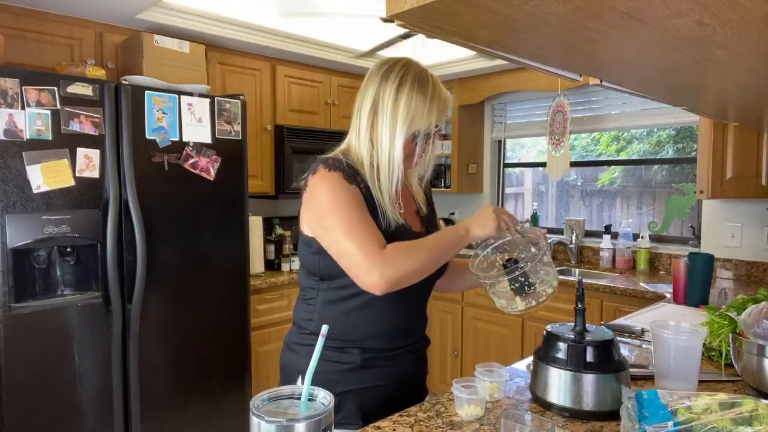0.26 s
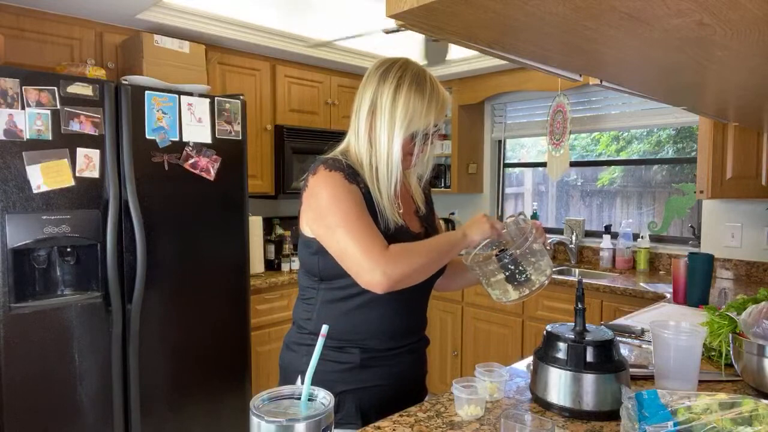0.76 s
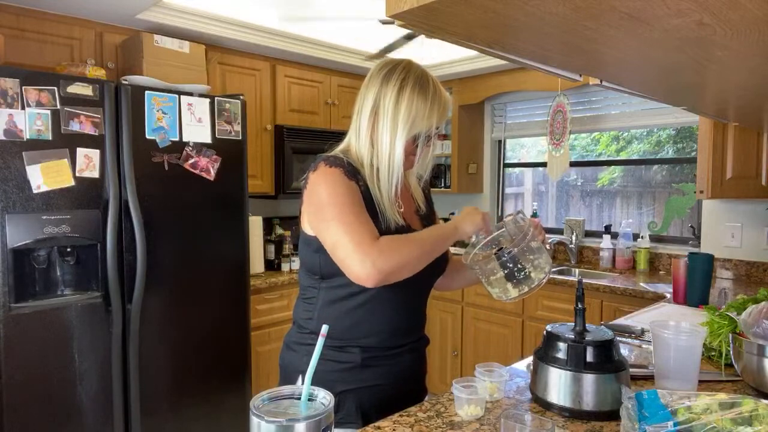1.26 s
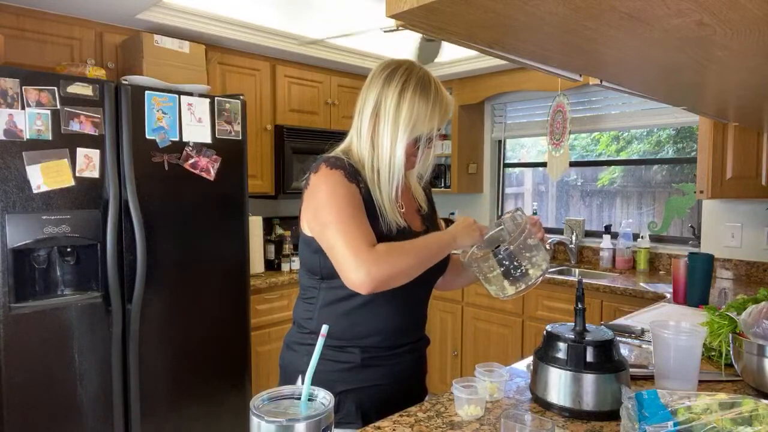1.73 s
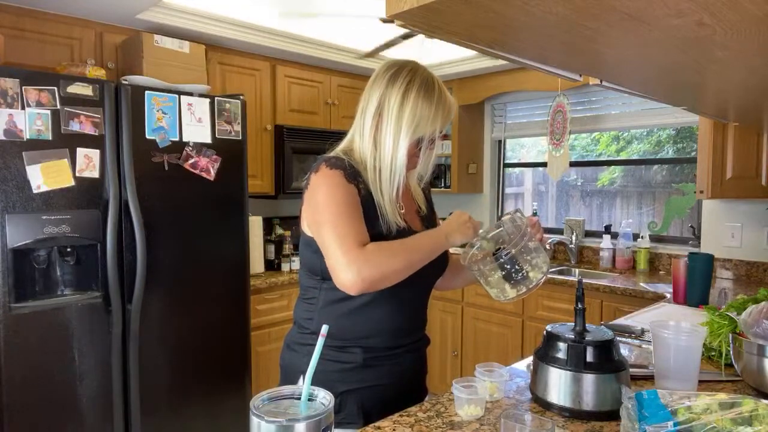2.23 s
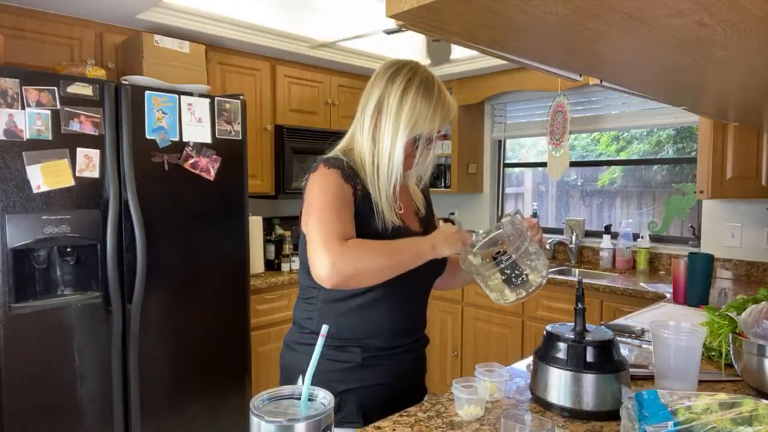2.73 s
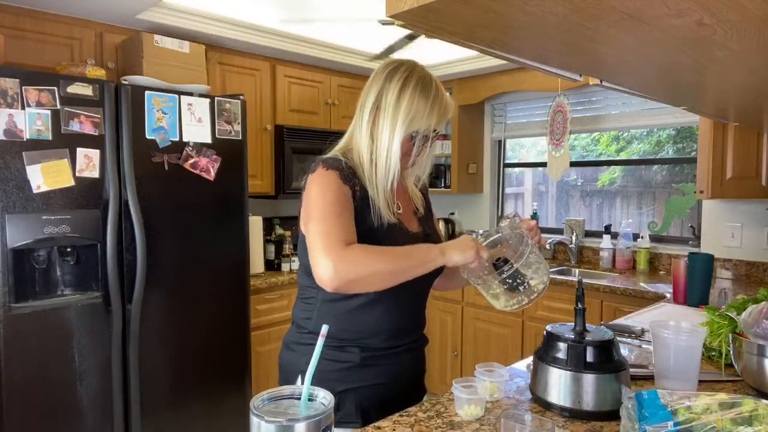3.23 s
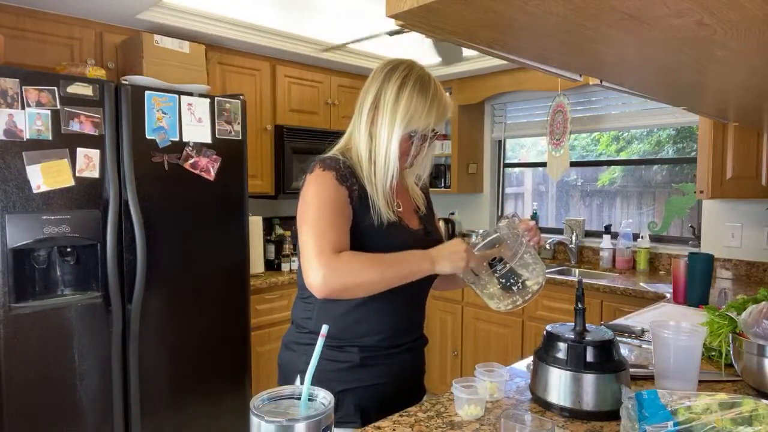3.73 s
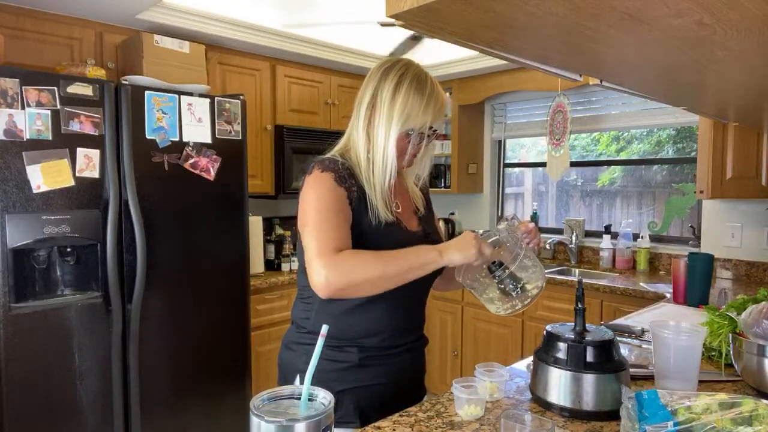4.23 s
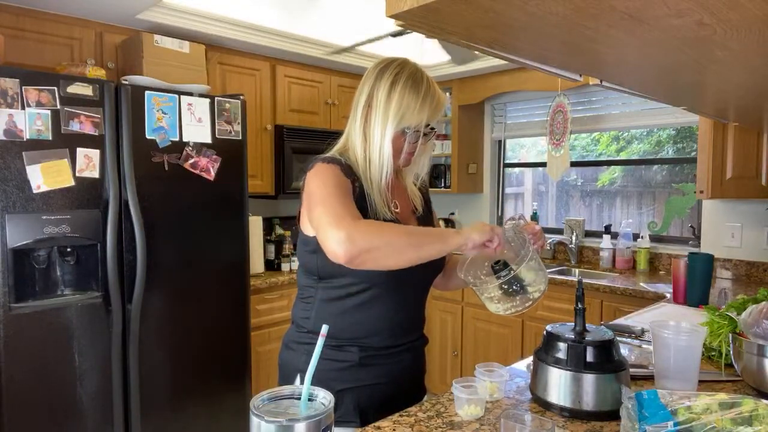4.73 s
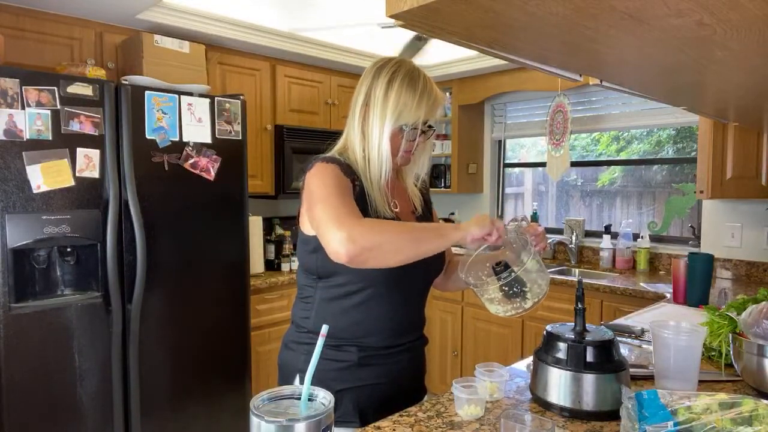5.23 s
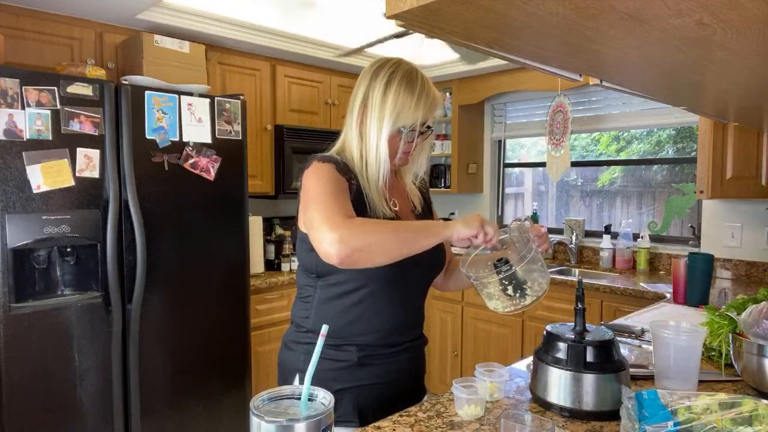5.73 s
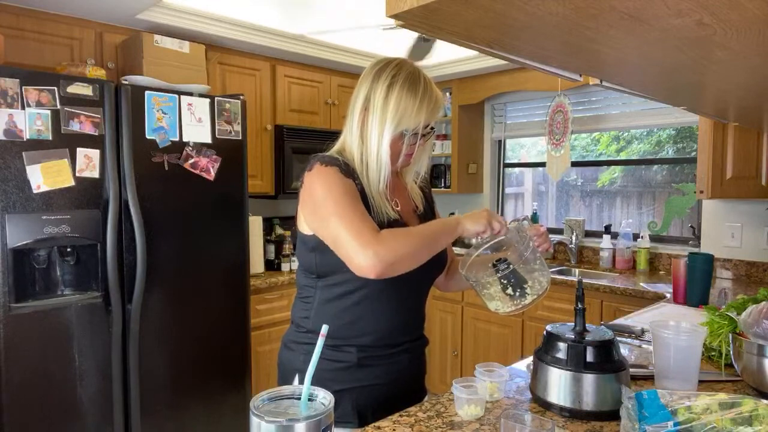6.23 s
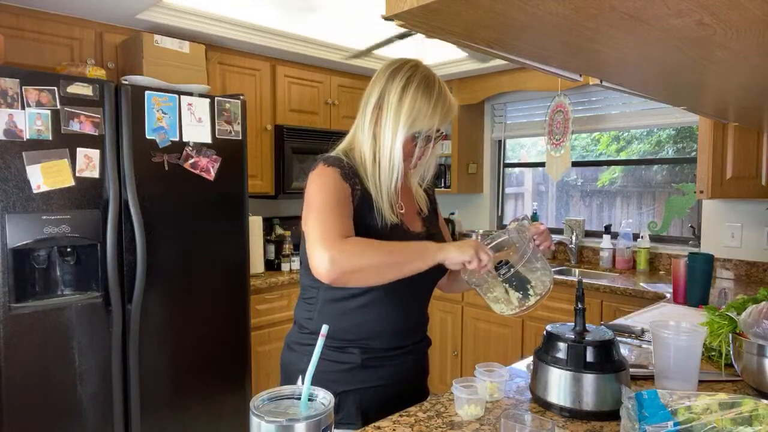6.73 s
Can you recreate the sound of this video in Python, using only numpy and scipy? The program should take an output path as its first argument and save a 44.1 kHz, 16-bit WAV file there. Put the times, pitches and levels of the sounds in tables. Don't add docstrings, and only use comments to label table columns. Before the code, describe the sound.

In a home kitchen, a steel spoon works inside a hard plastic food processor bowl. Sharp edge knocks, hollow thumps and light ticks come irregularly, two or three a second, with short faint scrapes between them. Two loud slaps fall near two seconds, close double knocks follow at three and four and a half, and loose rattles trail some blows. A small microphone nearby catches short room echoes and low fridge and fan hum.

```python
import sys
import numpy as np
from scipy import signal
from scipy.fft import rfft, irfft
from scipy.io import wavfile

SR = 44100
rng = np.random.default_rng(int(sys.argv[2]) if len(sys.argv) > 2 else 0)


def unload_audio(sound):
    columns = np.transpose(np.atleast_2d(sound))
    steps = np.round(np.clip(columns, -1, 1) * 32767)
    wavfile.write(sys.argv[1], SR, steps.astype(np.int16))


def attenuation_scalar(level_db):
    decades = np.asarray(level_db, float) / 20
    return 10 ** decades


N = 307127

# (frequency [Hz], level [dB])
HUM_SPECTRUM = [(24, -78), (40, -6.5), (60, -10), (100, -1.5), (127, -5.5), (167, -6.5), (226, -4),
                (297, -8.5), (402, -4.5), (680, -14), (1200, -15), (2500, -25.5), (6000, -34.5),
                (16000, -42.5)]
# (frequency [Hz], rms level [dB])
MAINS_LINES = [(119, -63), (238, -70.5)]
# (start [s], rise [s], fall [s], rasp level at the top [dB])
SLIDE_STROKES = [(0, 0.0014, 0.092, -49), (0.331, .1, 0.13, -47.5), (.78, 0.038, 0.16, -41.5),
                 (1.17, 0.027, 0.053, -41), (1.4, .004, 0.063, -62), (1.48, 0.058, 0.18, -52),
                 (1.7, 0.039, .06, -75), (1.79, 0.043, .03, -50), (2.065, 0.006, .06, -41.5),
                 (2.28, 0.085, 0.11, -50.5), (2.6, .006, 0.068, -47.5), (3.035, .02, 0.077, -37),
                 (3.46, .04, 0.078, -44), (4.81, 0.016, 0.045, -47.5), (5.04, .05, 0.085, -51.5),
                 (5.14, .004, 0.06, -53), (5.34, 0.087, 0.059, -51.5), (5.93, .006, 0.16, -54),
                 (6.84, 0.039, 0.069, -48.5)]
# (frequency [Hz], level [dB])
RASP_SPECTRUM = [(710, -2.5), (1200, 1.5), (3080, -1), (3740, 2), (4040, 1.5), (5130, -6.5), (13600, -9.5),
                 (16000, -10)]
# (frequency [Hz], t60 [s])
ROOM_DECAY = [(250, 0.24), (560, 0.38), (1250, 0.52), (2200, 0.49), (4000, 0.59), (8000, 0.44),
              (12100, 0.36)]
# (time [s], tick peak [dB], clack pitch [Hz], clack level [dB], sizzle level
# [dB])
GRAZES = [
    (0.067, -49, 6940, -51.5, -46),
    (.445, -53, 3530, -49, -54),
    (0.855, -70, 3760, -35, -58),
    (1.104, -52, 3340, -51.5, -59),
    (1.705, -58, 3300, -60, -56),
    (1.978, -45, 3200, -49, -52),
    (2.068, -38, 3160, -35.5, -40),
    (3.049, -32, 2500, -27.5, -58),
    (5.466, -37, 3230, -71, -52),
]
TAPS = [
    (0.072, -28, 4040, -65, -41.5),
    (0.4883, -35, 3060, -52, -40.5),
    (0.924, -32, 3250, -38.5, -41),
    (1.5, -35, 2980, -47, -36.5),
    (1.7439, -44, 3260, -48, -47),
    (1.788, -45, 3120, -50, -49.5),
    (2.3436, -35, 3500, -42, -40),
    (2.3692, -38, 3170, -41.5, -46),
    (3.55, -34, 3600, -39, -52),
    (5.94, -41, 3100, -47.5, -45),
]
# (time [s], sizzle level [dB], struck spot pitch [Hz], struck spot level [dB], clack pitch [Hz])
EDGE_KNOCKS = [(0.314, -22.5, 1800, -25, 3300), (1.1408, -29.5, 1664, -20.5, 3390),
               (1.3682, -26, 1710, -32, 4000), (2.7868, -23.5, 1660, -21, 4000),
               (3.021, -27.5, 1510, -26, 3700), (3.4214, -16.5, 1915, -20, 3520),
               (3.7216, -20, 1657, -23, 3140), (4.0455, -21, 1683, -23, 2774),
               (4.3776, -32, 1600, -29.5, 3660), (4.7954, -40, 1690, -39, 3980),
               (5.0183, -37, 1852, -37.5, 3700), (5.1231, -25.5, 1366, -28.5, 3220),
               (6.3415, -30.5, 1694, -18.5, 3300), (6.7885, -38, 1590, -39.5, 2810)]
LIP_KNOCKS = [
    (2.2566, -36.5, 2050, -38, 3180),
    (5.3052, -27, 1760, -27.5, 4040),
    (5.6079, -21.5, 1656, -23.5, 3450),
    (6.229, -27.5, 1730, -32, 3630),
]
# (time [s], hollow level [dB], rim level [dB], struck spot level [dB], clack level [dB])
BACK_KNOCKS = [(.748, -23, -34, -24, -27), (1.571, -37, -37.5, -34, -33), (1.847, -23, -17, -20, -24),
               (2.0963, -24, -15.5, -19, -23.5), (2.5721, -37.5, -33, -39, -35),
               (3.0941, -20, -16.5, -32, -23.5), (3.1319, -18.5, -18.5, -27, -28.5),
               (4.4006, -21, -19, -30, -22.5), (4.4386, -17.5, -20.5, -29, -27),
               (5.1788, -22.5, -24.5, -33, -38), (6.1264, -35.5, -33.5, -43, -36),
               (6.5756, -32, -36.5, -38, -34.5), (6.816, -22, -23, -29.5, -25)]
# (first bounce [s], hollow level [dB], rim level [dB], bounces [count])
RATTLES = [(.7747, -21, -33, 1), (1.1697, -25.5, -54, 1), (1.5848, -24.5, -35.5, 2), (2.1157, -29, -42, 1),
           (3.1199, -25.5, -19, 1), (3.1507, -21.5, -34, 3), (3.2977, -42.5, -46, 1),
           (3.554, -24, -31.5, 3), (4.2094, -40, -44.5, 1), (4.4611, -24, -36.5, 3), (5.1987, -26, -32, 3),
           (6.5944, -29, -52, 1), (6.8338, -22, -26, 4)]
# (frequency [Hz], level [dB], t60 [s])
SPOON_MODES = [(3340, -10, .03), (4040, -18, .03)]
# (frequency [Hz], level [dB], t60 [s])
HOLLOW_MODES = [(342.3, -8, 0.085), (446, 0, 0.025), (547.6, 0.5, 0.072), (612, -6, 0.043),
                (637.3, -9.5, 0.07), (739, -8, 0.059), (949, -6, 0.031)]
# (frequency [Hz], level [dB], t60 [s])
RIM_MODES = [(1250, 0, .065), (1310, -6, .02), (1180, -10, .012)]
# (frequency [Hz], level [dB], t60 [s])
WALL_MODES = [(2027, -1, 0.032), (2163, -13, 0.1), (2460, -19, 0.004), (2464, -17, 0.064)]
# (time [s], pitch [Hz], peak level [dB])
SLAPS = [
    (1.1416, 1690, -13),
    (1.8456, 1390, -3.5),
    (2.0962, 1400, -5),
    (6.3418, 1620, -10),
    (6.5758, 1420, -20),
]
# (time [s], pitch [Hz], level [dB], t60 [s])
RINGS = [
    (1.142, 1690, -23, .07),
    (2.788, 4045, -25, .03),
    (5.609, 3420, -21, .025),
    (5.609, 780, -24, .02),
    (6.342, 1680, -22, .06),
]

HUM_DB = -54.5
SLIDE_RISE_DB, SLIDE_FALL_DB, SLIDE_FALL_BEND = 10, 20, 2.1
EARLY_T60_S = .09
BOWL_LAG_S = .0007
EDGE_TICK_DB, EDGE_CLACK_DB = 8.5, 2.5
EDGE_RIM_DB, EDGE_WALL_DB, EDGE_HOLLOW_DB = -5.5, 10, -6
LIP_RIM_DB, LIP_WALL_DB, LIP_HOLLOW_DB = -4.5, 3.0, -13.0
BACK_SPOT_HZ, BACK_CLACK_HZ = 1475, 3250
BACK_TICK_DB, BACK_SIZZLE_DB = 5, -7.5
BACK_WALL_DB, WALL_DAMPING = 3, 1.37
BOUNCE_GAP_S, BOUNCE_STRETCH, BOUNCE_LOSS_DB = .0148, 1.35, 5
RATTLE_SPOT_HZ, RATTLE_SPOT_DB, RATTLE_WALL_DB = 1438, -7.5, -1
SLAP_S, SLAP_ROOM_DB = 0.0039, -10


def at_hz(points, hz):
    points = np.array(points)
    return np.interp(np.log(hz), np.log(points[:, 0]), points[:, 1])


def coloured(white, spectrum):
    hz = np.maximum(np.fft.rfftfreq(len(white), 1 / SR), 1)
    shaped = irfft(rfft(white) * attenuation_scalar(at_hz(spectrum, hz)), len(white))
    return shaped / np.sqrt(np.mean(shaped ** 2) + 1e-20)


def band(x, low_hz, high_hz):
    sos = signal.butter(2, [low_hz, min(high_hz, .45 * SR)], "band", fs=SR, output="sos")
    return signal.sosfilt(sos, x)


def add(out, s, sound):
    at = round(s * SR)
    out[at:at + len(sound)] += sound[:N - at]


def struck(modes, chance, rise_s, spread_db=0.0, detune=0.01):
    t = np.arange(4096) / SR
    hz, level_db, t60 = np.transpose(modes)[:, :, None]
    count = len(modes)
    strength = chance[:count, None]
    shift = chance[8:8 + count, None]
    gain = attenuation_scalar(level_db + spread_db * strength) * np.sign(shift)
    modes_ringing = gain * np.sin(2 * np.pi * hz * (1 + detune * shift) * t) * attenuation_scalar(-60 * t / t60)
    return modes_ringing.sum(axis=0) * (1 - np.exp(-t / rise_s)) / np.sqrt(count)


def appliances():
    t = np.arange(N) / SR
    lines = sum(np.sqrt(2) * attenuation_scalar(level_db) * np.sin(2 * np.pi * hz * t) for hz, level_db in MAINS_LINES)
    return attenuation_scalar(HUM_DB) * coloured(rng.standard_normal(N), HUM_SPECTRUM) + lines


def slides():
    slips = (rng.random(N) < 5000 / SR) * attenuation_scalar(3.56 * rng.exponential(1, N)) * rng.choice([-1, 1], N)
    steps = N // 400 + 2
    pressure = np.interp(np.arange(N) / 400, np.arange(steps), rng.standard_normal(steps))
    rasp = coloured(slips * attenuation_scalar(0.99 * pressure), RASP_SPECTRUM)
    level, t = np.zeros(N), np.arange(N) / SR
    for s, rise_s, fall_s, top_db in SLIDE_STROKES:
        a, b = round(s * SR), round((s + rise_s + fall_s) * SR)
        since_top = t[a:b] - s - rise_s
        fade = np.clip(np.minimum(since_top + rise_s, fall_s - since_top) / .015, 0, 1)
        dip = SLIDE_RISE_DB * np.clip(-since_top / rise_s, 0, 1)
        dip += SLIDE_FALL_DB * np.clip(since_top / fall_s, 0, 1) ** SLIDE_FALL_BEND
        level[a:b] += fade * attenuation_scalar(top_db - dip)
    return level * rasp


def kitchen(x, early_db=-3, late_db=-5, first_s=0.0017):
    t = np.arange(SR // 2) / SR
    edges = 100 * 2 ** np.arange(0, 8, .5)
    white = rng.standard_normal((3, len(t)))
    late = 0
    for k, (low_hz, high_hz) in enumerate(zip(edges, edges[1:])):
        t60 = at_hz(ROOM_DECAY, np.sqrt(low_hz * high_hz))
        late = late + band(white[k % 2], low_hz, high_hz) * attenuation_scalar(-60 * t / t60) / np.sqrt(t60)
    early = white[2] ** 3 * attenuation_scalar(-60 * t / EARLY_T60_S)
    answer = attenuation_scalar(early_db) * early / np.linalg.norm(early) + attenuation_scalar(late_db) * late / np.linalg.norm(late)
    return signal.fftconvolve(x, answer * np.clip(t / first_s, 0, 1) ** 2)[:N]


def chatter(white, t60, rise_s=0.00073):
    t = np.arange(len(white)) / SR
    return white * attenuation_scalar(-60 * t / t60) * (1 - np.exp(-t / rise_s))


def knocks():
    pairs = []
    places = [(EDGE_KNOCKS, EDGE_RIM_DB, EDGE_WALL_DB, EDGE_HOLLOW_DB),
              (LIP_KNOCKS, LIP_RIM_DB, LIP_WALL_DB, LIP_HOLLOW_DB)]
    for rows, rim, wall, hollow in places:
        for s, sizzle, spot_hz, spot, clack_hz in rows:
            clack = (sizzle + spot) / 2 + EDGE_CLACK_DB
            pairs.append(((s + BOWL_LAG_S, spot + wall, spot + hollow, spot + rim, spot_hz, spot),
                          (s, sizzle + EDGE_TICK_DB, clack_hz, clack, sizzle)))
    for s, hollow, rim, spot, clack in BACK_KNOCKS:
        wall = clack + BACK_WALL_DB - WALL_DAMPING * (spot - clack)
        pairs.append(((s + BOWL_LAG_S, wall, hollow, rim, BACK_SPOT_HZ, spot),
                      (s, clack + BACK_TICK_DB, BACK_CLACK_HZ, clack, clack + BACK_SIZZLE_DB)))
    pairs.sort()
    return [pair[0] for pair in pairs], [pair[1] for pair in pairs]


def spoon():
    touches = sorted(knocks()[1] + TAPS) + GRAZES
    near, around = np.zeros(N), np.zeros(N)
    click = np.eye(1, 1024, k=64)[0]
    chance = rng.standard_normal((len(touches), 2, 16))
    patter = rng.standard_normal((len(touches), 2, 1024))
    hz = np.maximum(np.fft.rfftfreq(1024, 1 / SR), 1)
    for (s, tick_db, clack_hz, clack_db, sizzle_db), luck, noise in zip(touches, chance, patter):
        clack = [(clack_hz, 0, .028), (clack_hz * 0.89, -4, .007), (clack_hz * 1.092, -4, .007)]
        tone = attenuation_scalar(clack_db + 2.5) * struck(clack, luck[0], 0.00017, detune=0.0025)
        tone += attenuation_scalar(clack_db + 8.5) * struck(SPOON_MODES, luck[1], 0.00029, detune=0.0034)
        add(near, s, tone)
        add(around, s, tone)
        spectrum = [(250, clack_db - 16), (800, clack_db + 15.5), (3300, clack_db + 19.5),
                    (6300, tick_db + 5.5), (10500, sizzle_db + 9), (16000, sizzle_db + 6.5)]
        ripples = np.concatenate([luck[1, 2:8], luck[1, 10:], luck[0, 3:8]])
        ripple_db = 1.8 * np.interp(hz, np.linspace(2500, 16000, len(ripples)), ripples)
        colour = attenuation_scalar(at_hz(spectrum, hz) + ripple_db)
        burst = chatter(noise[0], 0.014)
        add(near, s, irfft(rfft(burst) * colour))
        add(around, s, irfft(rfft(click) * colour) * np.linalg.norm(burst))
        ramp = np.arange(1024)
        brush = noise[1] * np.clip(ramp / 350, 0, 1) * (ramp < 350)
        dull = colour / (1 + (hz / 6000) ** 4)
        add(near, s - 350 / SR, attenuation_scalar(-28) * irfft(rfft(brush) * dull))
    return near, around


def bowl():
    hard, loose = knocks()[0], rebounds()
    blows = hard + loose
    softness = [1] * len(hard) + [3.5] * len(loose)
    out, chance = np.zeros(N), rng.standard_normal((len(blows), 4, 16))
    for (s, wall_db, hollow_db, rim_db, spot_hz, spot_db), luck, soft in zip(blows, chance, softness):
        spot = [(spot_hz, 0, .011), (spot_hz * 1.004, -13, .05), (spot_hz * 0.833, -4, .008),
                (spot_hz * 1.15, -5, .008), (800, -13, .008)]
        add(out, s, attenuation_scalar(hollow_db + 10.0) * struck(HOLLOW_MODES, luck[0], .001 * soft, 3.5))
        add(out, s, attenuation_scalar(rim_db + 10.5) * struck(RIM_MODES, luck[1], .0005 * soft, 1.2, .004))
        add(out, s, attenuation_scalar(spot_db + 22.5) * struck(spot, luck[2], .0012 * soft, 1.0, .004))
        add(out, s, attenuation_scalar(wall_db - 1.0) * struck(WALL_MODES, luck[3], .0006 * soft, 1.5))
    return out


def rebounds():
    rows = []
    for s, hollow, rim, bounces in RATTLES:
        for k in range(round(bounces)):
            loss = BOUNCE_LOSS_DB * k
            mean = (hollow + rim) / 2 - loss
            rows.append((s, mean + RATTLE_WALL_DB, hollow - loss, rim - loss,
                         RATTLE_SPOT_HZ, mean + RATTLE_SPOT_DB))
            s = s + BOUNCE_GAP_S * BOUNCE_STRETCH ** k
    return rows


def slaps():
    out, t = np.zeros(N), np.arange(round(SLAP_S * SR)) / SR
    swell = np.sin(np.pi * t / SLAP_S) ** 2
    for s, hz, peak_db in SLAPS:
        add(out, s, attenuation_scalar(peak_db) * swell * np.sin(2 * np.pi * hz * t))
    return out


def rings():
    out, t = np.zeros(N), np.arange(SR // 5) / SR
    for s, hz, level_db, t60 in RINGS:
        envelope = attenuation_scalar(level_db - 60 * t / t60) * (1 - np.exp(-t / .0012))
        add(out, s, envelope * np.sin(2 * np.pi * hz * t))
    return out


def scene():
    body = bowl() + rings() + slides()
    slap = slaps()
    near, around = spoon()
    direct = body + slap + near
    room = kitchen(body + attenuation_scalar(SLAP_ROOM_DB) * slap + around)
    return (direct + room + appliances())[None]


def band_limit(x):
    return signal.sosfilt(signal.butter(12, 16960, fs=SR, output="sos"), x)


def record(dry):
    x = signal.sosfilt(signal.butter(6, 50, "high", fs=SR, output="sos"), dry)
    rounded = 1.168 * np.tanh(x / 1.092)
    mix = signal.sosfilt(signal.cheby2(10, 34, 16200, fs=SR, output="sos"), rounded)
    return band_limit(mix)


dry = scene()
out = record(dry)
unload_audio(out)
```